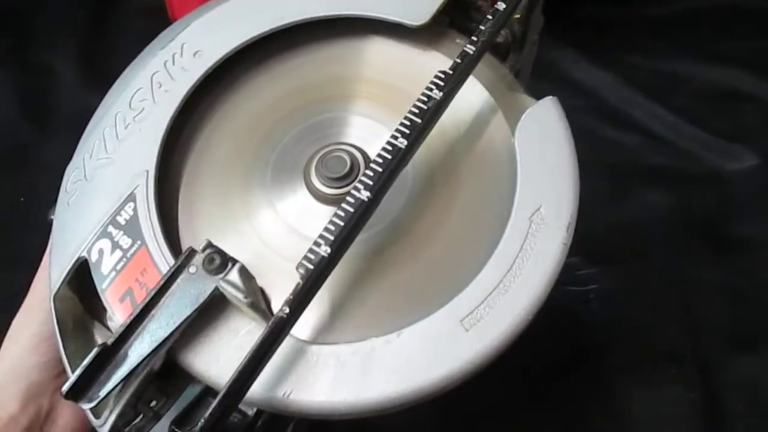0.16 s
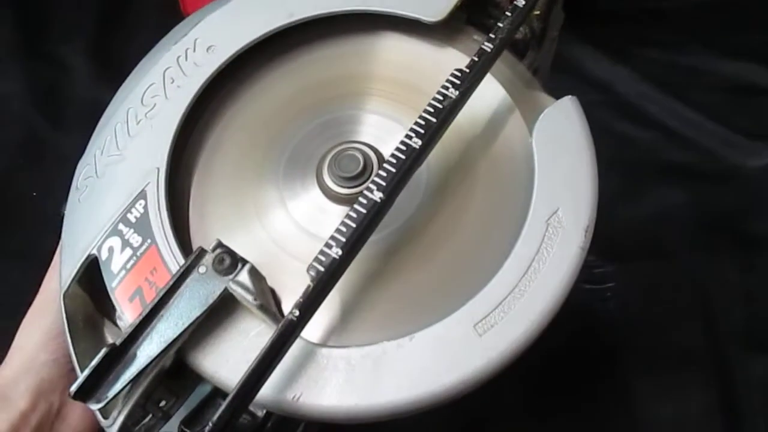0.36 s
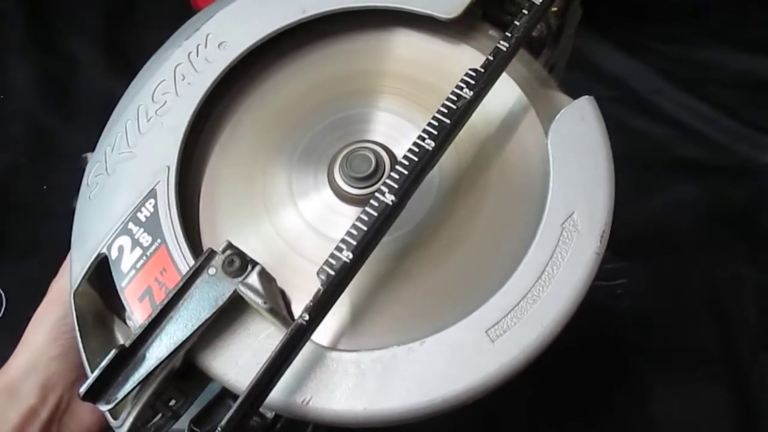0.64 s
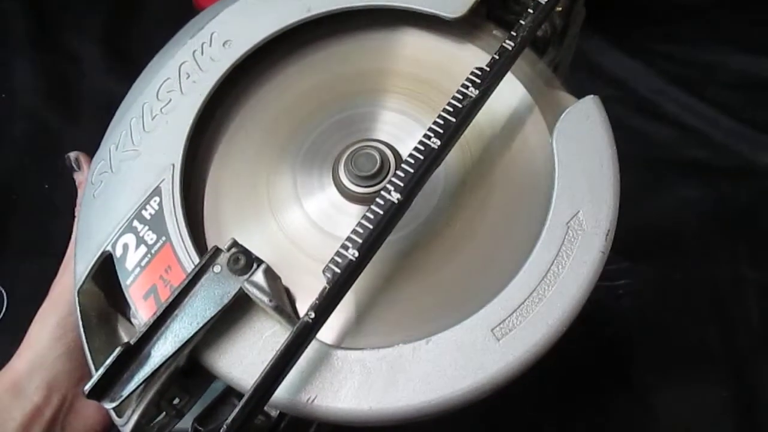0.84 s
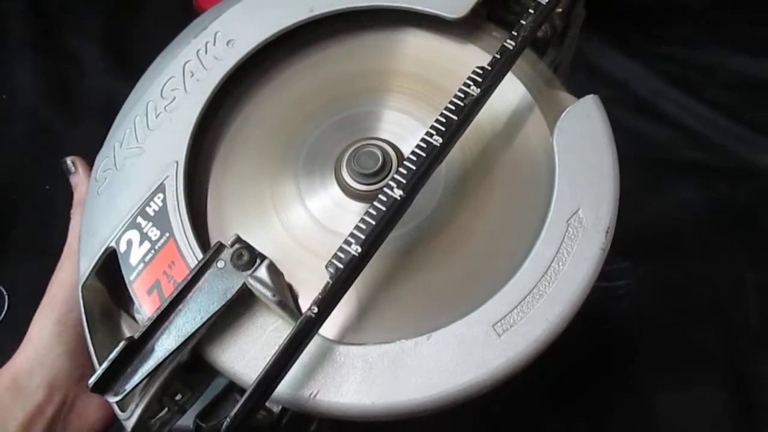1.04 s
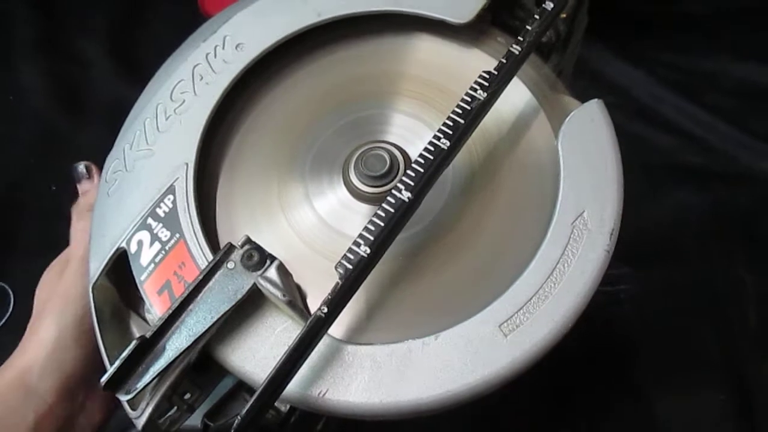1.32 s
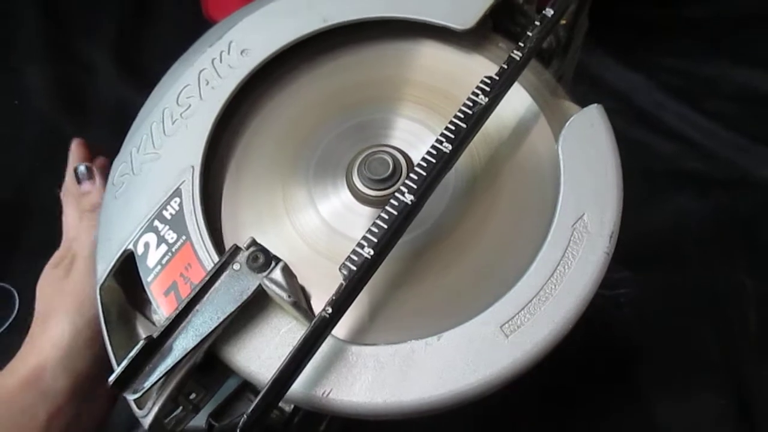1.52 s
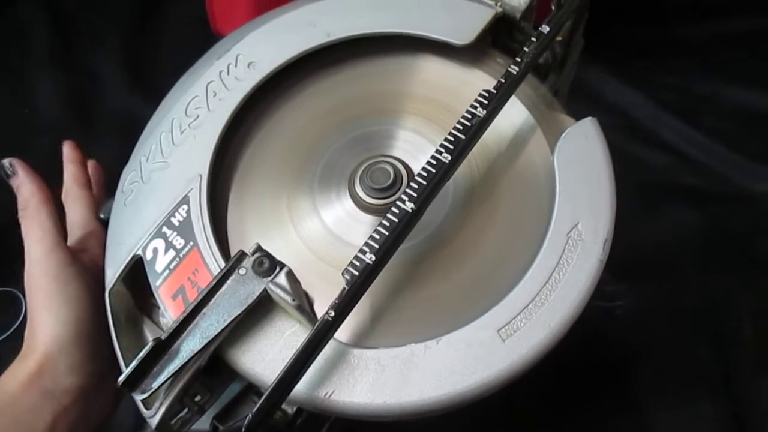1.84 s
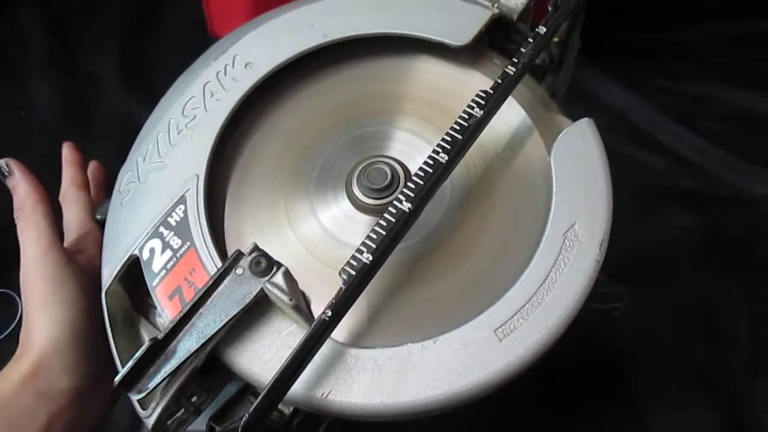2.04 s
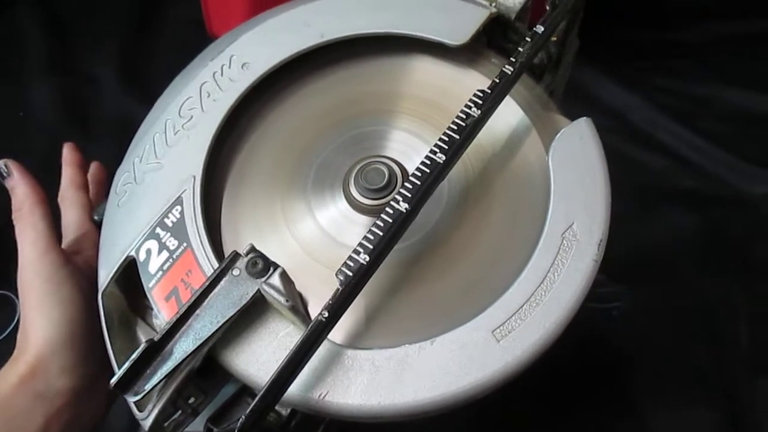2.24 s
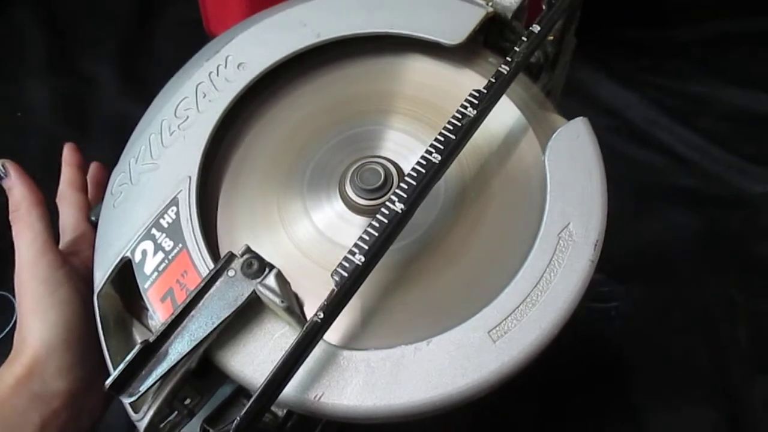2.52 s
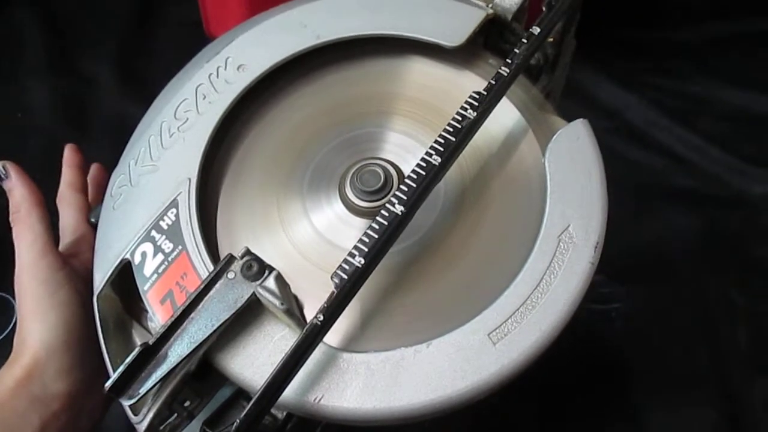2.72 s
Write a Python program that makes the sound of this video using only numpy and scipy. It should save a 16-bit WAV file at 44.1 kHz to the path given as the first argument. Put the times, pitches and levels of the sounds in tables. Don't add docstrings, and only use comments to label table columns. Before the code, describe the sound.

A circular saw whirs loudly at full speed, then coasts down, whine sinking amid rattling gear chatter

```python
import sys
import numpy as np
from scipy import signal
from scipy.fft import rfft, irfft, next_fast_len
from scipy.io import wavfile
from scipy.ndimage import uniform_filter1d

SR = 44100
rng = np.random.default_rng(int(sys.argv[2]) if len(sys.argv) > 2 else 0)


def wrap_up_sound(samples):
    columns = np.atleast_2d(samples).T
    tamed = np.clip(columns, -1, 1)
    steps = np.round(tamed * 32767).astype(np.int16)
    wavfile.write(sys.argv[1], SR, steps)


def volts_from_db(level):
    exponent = np.asarray(level, float) / 20
    return 10 ** exponent


N = 126567

# (time [s], fan whine level [dB], unbalance hum level [dB])
SHAFT_LEVELS = [(0.0, -19.5, -33), (0.15, -18.5, -33.5), (0.32, -17.5, -37.5), (0.4, -21.5, -38),
                (0.49, -31, -33), (0.57, -26, -43), (0.8, -28.5, -36.5), (0.95, -22.5, -39.5),
                (1.2, -21, -49), (1.34, -24.5, -56), (1.45, -21, -48), (1.62, -20.5, -53),
                (1.88, -32, -46.5), (2.06, -27, -42), (2.29, -37, -46), (2.45, -33.5, -43.5),
                (2.72, -22.5, -47), (2.87, -21.5, -49)]
# (multiple of shaft speed, level [dB], loudest near [Hz], reach [Hz])
SHAFT_MULTIPLES = [(.172, -60, 60, 60), (2, -48, 570, 35), (4, -43, 1500, 400), (10, -40, 2400, 300),
                   (11, -37, 3320, 160), (15, -48, 5000, 1500), (16, -44, 4850, 700), (24, -41, 9900, 300),
                   (36, -58, 14800, 500)]
# (time [s], air level [dB], chatter level [dB])
RUNNING_LEVELS = [
    (0, -15.5, -21),
    (.34, -17, -24.5),
    (.5, -17.5, -22.5),
    (.9, -20, -21),
    (1.5, -21, -21),
    (2.0, -22.5, -21.5),
    (2.45, -21.5, -19.5),
    (2.87, -23, -19.5),
]
# (frequency [Hz], level per Hz [dB])
AIR_FAST = [(20, -46), (300, -15), (600, -10.5), (1100, 0), (2070, -9), (3600, -4.5), (8800, -14),
            (11000, -25.5), (15600, -36)]
AIR_SLOW = [(20, -29), (190, -24.5), (330, -11), (1100, -13), (2200, -1), (4500, -13.5), (8300, -17.5),
            (11000, -29.5), (15600, -51)]
# (frequency [Hz], width [Hz], level [dB])
HOUSING = [(879, 192, -4), (1024, 123, -0.5), (1138, 82, 0.6), (1242, 41, 0.5), (1398, 140, -6),
           (1757, 196, -11), (2369, 107, -2.5), (2537, 110, -2), (2704, 48, 1.5), (3480, 380, -10),
           (4190, 99, -8), (5360, 124, -10.5), (6470, 190, -11)]
# (frequency [Hz], width [Hz], level [dB])
GEARS = [(4830, 1900, -7.5), (5770, 200, 0), (6170, 370, -2.5), (6675, 430, -2.5), (7120, 460, -2.5),
         (7970, 670, -6.5), (8570, 380, -2), (8960, 250, 0.5), (9280, 330, 1.5), (9970, 320, -5.5),
         (10330, 280, -6.5), (11130, 490, -14.5), (12700, 1100, -37), (15200, 1800, -32)]
# (time of peak [s], gear ring level [dB], blade ring
# level [dB])
KNOCKS = [(0.026, -36, -24), (0.055, -44, -28), (0.083, -29, -29), (0.113, -23, -22),
          (0.138, -24, -25), (0.156, -26, -29), (0.183, -43, -25.5), (0.212, -48, -25),
          (0.24, -36, -25), (0.268, -33, -26), (0.297, -40, -28), (0.316, -36, -26), (0.344, -37, -27),
          (0.361, -21, -29), (0.391, -28, -34), (0.416, -26, -34.0), (0.446, -29, -33),
          (0.475, -20.5, -41), (0.506, -30, -37), (0.535, -18.5, -30), (0.566, -29, -29.0),
          (0.593, -23, -28), (0.619, -25, -40), (0.689, -33, -42), (0.718, -23, -31),
          (0.817, -21, -34.0), (0.847, -27, -41), (0.885, -20.5, -39), (0.916, -28, -34),
          (0.951, -28, -39),
          (0.98, -17.5, -33), (1.017, -27, -37), (1.044, -27, -40), (1.074, -22, -43),
              (1.124, -22, -45), (1.16, -18.5, -35), (1.183, -18.5, -37), (1.218, -21, -30),
              (1.249, -21, -29), (1.277, -27, -33.0), (1.33, -21.5, -39), (1.342, -27, -38),
              (1.383, -21, -30), (1.412, -30, -30), (1.442, -25, -33.0), (1.469, -20, -28.5),
              (1.499, -22, -35.0), (1.532, -24, -28.5), (1.562, -23, -35), (1.579, -21, -30),
              (1.606, -21.5, -33), (1.654, -21, -32), (1.689, -21.5, -27), (1.724, -27, -34),
              (1.758, -21, -33), (1.797, -20, -31), (1.83, -23, -32), (1.849, -18, -32), (1.885, -20, -33),
              (1.93, -19, -29),
          (1.965, -20, -26), (1.998, -26, -30), (2.032, -23, -25.5), (2.07, -21.5, -42),
               (2.104, -25, -31), (2.139, -21.5, -30), (2.176, -19.5, -35), (2.205, -19.5, -32),
               (2.254, -33, -33), (2.272, -19.5, -32), (2.304, -30, -36), (2.322, -26, -23.5),
               (2.35, -22, -34.0), (2.371, -22, -28), (2.402, -21, -32), (2.443, -25, -23.5),
               (2.48, -23, -32), (2.497, -26, -27), (2.522, -29, -32), (2.543, -27, -31),
               (2.575, -22.5, -29), (2.599, -28, -31), (2.625, -21.5, -32), (2.658, -28, -27),
               (2.699, -22, -23.5), (2.738, -28, -34), (2.774, -21, -27.0), (2.814, -20.5, -32.0),
               (2.834, -40, -42), (2.863, -21, -37)]
# (time [s], gear ring level [dB],
# blade ring level [dB])
MORE_KNOCKS = [(0.046, -16, -22), (0.446, -22, -26), (0.495, -18, -27), (1.015, -18, -28), (1.058, -26, -29),
               (1.068, -20, -34), (1.292, -11, -28), (1.361, -18, -33), (1.406, -15, -31), (1.435, -17, -33),
               (1.456, -13, -32), (1.75, -20, -33), (1.778, -34, -36), (1.977, -18, -26), (2.018, -21, -30),
               (2.039, -16, -24), (2.091, -23, -32), (2.302, -20, -28), (2.436, -20, -39), (2.513, -27, -40),
               (2.536, -13, -30), (2.675, -14, -27), (2.727, -22, -31), (2.834, -19, -31)]
# (time [s], frequency [Hz], level [dB], length [s])
FLARES = [
    (0.026, 1120, -21, 0.079),
    (0.233, 1121, -21, 0.072),
    (0.666, 900, -26, 0.07),
    (.93, 890, -26.5, .1),
    (1.822, 2420, -25.5, 0.077),
    (2.17, 1115, -26, 0.073),
    (2.2, 2730, -31, 0.043),
    (2.526, 1202, -24.5, 0.11),
    (2.66, 2424, -26, 0.091),
    (2.752, 1490, -32, 0.15),
]
# (time [s], level [dB])
TICKS = [(1.3074, -35), (1.4396, -30), (1.5763, -34), (1.6551, -34), (1.7215, -38), (1.926, -38),
         (1.9984, -27), (2.0293, -38), (2.0672, -38), (2.1021, -40), (2.1375, -39), (2.2039, -36),
         (2.2717, -36), (2.3002, -40), (2.3206, -37), (2.3451, -37), (2.369, -35), (2.3984, -39),
         (2.4418, -39), (2.4748, -34), (2.5197, -40), (2.6194, -39), (2.6539, -35), (2.6988, -32),
         (2.7347, -34), (2.7726, -37), (2.8075, -38)]
# (frequency [Hz], width [Hz], level [dB])
RIM = [(11200, 900, 2), (12600, 500, -2), (13900, 700, -10), (15200, 700, -12)]


def evened(x):
    return x / np.sqrt(np.mean(x ** 2) + 1e-20)


def curve(table, column):
    rows = np.array(table, float)
    return np.interp(np.arange(N) / SR, rows[:, 0], rows[:, column])


def read_spectrum(points, hz):
    point_hz, level_db = np.transpose(points)
    return np.interp(np.log(hz + 1), np.log(point_hz + 1), level_db)


def wander(seconds):
    size = max(int(seconds * SR), 2)
    once = uniform_filter1d(rng.standard_normal(N), size)
    return evened(uniform_filter1d(once, size))


def ring(x, modes, order):
    size = next_fast_len(N + 4096)
    one_sample_delay = np.exp(-2j * np.pi * np.fft.rfftfreq(size))
    response = 0
    for k, (hz, width_hz, db) in enumerate(modes):
        pole = np.exp((2j * np.pi * hz - np.pi * width_hz) / SR)
        mode = 0
        for p in (pole, pole.conj()):
            mode = mode + ((1 - abs(pole)) / (1 - p * one_sample_delay)) ** order
        response = response + (-1) ** k * volts_from_db(db) * mode
    response = response / np.sqrt(np.mean(abs(response) ** 2))
    return irfft(rfft(x, size) * response, size)[:N]


def grains(per_s, spread_db):
    size_db = spread_db * np.minimum(rng.exponential(1, N), 5)
    contact = volts_from_db(size_db) * rng.choice([-1., 1.], N)
    return evened(contact * (rng.random(N) < per_s / SR))


def shaft_speed():
    t = np.arange(N) / SR
    powered = 407 + 18.8 * t
    coasting = 211.57 * np.tan(1.09685 - 0.119955 * (t - 0.335))
    return np.minimum(powered, coasting)


def shaft_tones():
    speed = shaft_speed()
    turn = 2 * np.pi * np.cumsum(speed) / SR
    whine_level = volts_from_db(curve(SHAFT_LEVELS, column=1) + 1.17 * wander(0.012))
    whine = whine_level * np.cos(12 * turn + 0.13 * wander(0.004))
    hum_level = volts_from_db(curve(SHAFT_LEVELS, column=2) + 0.86 * wander(0.047))
    hum = hum_level * np.cos(turn + 0.67 * wander(0.024))
    out = whine + hum
    for multiple, db, loudest_hz, reach_hz in SHAFT_MULTIPLES:
        resonance = np.exp(-((multiple * speed - loudest_hz) / reach_hz) ** 2 / 2)
        level = volts_from_db(db + 4.5 * wander(0.049))
        out += resonance * level * np.cos(multiple * turn + 0.2 * wander(0.046))
    return np.sqrt(2) * out


def air():
    fast_hz, slow_hz, patchy_db = 380, 232, 0.5
    size, hop = 2048, 512
    frames, hz = N // hop + 5, np.fft.rfftfreq(size, 1 / SR)
    real, imaginary, patches = rng.standard_normal((frames, len(hz), 3)).T
    patches = evened(uniform_filter1d(uniform_filter1d(patches, 16, 0), 5, 1))
    speed = shaft_speed()[np.minimum(np.arange(frames) * hop, N - 1)]
    fast = np.clip((speed - slow_hz) / (fast_hz - slow_hz), 0, 1)
    fast_db, slow_db = read_spectrum(AIR_FAST, hz), read_spectrum(AIR_SLOW, hz)
    colour = volts_from_db(fast_db[:, None] * fast + slow_db[:, None] * (1 - fast))
    colour = colour / np.sqrt((colour ** 2).mean(0))
    spectrum = (real + 1j * imaginary) * colour * volts_from_db(patchy_db * patches)
    rush = signal.istft(spectrum, nperseg=size, noverlap=size - hop)[1][:N]
    return volts_from_db(curve(RUNNING_LEVELS, column=1)) * evened(rush)


def chatter():
    throb = np.exp(0.17 * wander(0.0066))
    drive = grains(per_s=7000, spread_db=2) * throb
    return volts_from_db(curve(RUNNING_LEVELS, column=2)) * evened(ring(drive, HOUSING, order=1))


def magnet_rumble():
    off_s, fade_s, level_db, centre_hz = 0.42, 0.016, -39.5, 151
    band = signal.butter(1, [centre_hz / 2, 2 * centre_hz], "bandpass", fs=SR, output="sos")
    low = signal.sosfilt(band, rng.standard_normal(N))
    return volts_from_db(level_db) * evened(low) / (1 + np.exp((np.arange(N) / SR - off_s) / fade_s))


def knocks():
    rise_s, fall_s, tail_s, tail = 0.0016, 0.0041, 0.024, 0.12
    knock_db, more_knocks_db = 1, -11
    gear_rub_db, blade_rub_db, body_db = -37.5, -51.5, 4.5
    t = np.arange(-2000, 2001) / SR
    after = np.exp(-abs(t) / fall_s) + tail * np.exp(-abs(t) / tail_s)
    flurry = np.where(t < 0, np.exp(-abs(t) / rise_s), after / (1 + tail))
    heavy, light = np.array(KNOCKS), np.array(MORE_KNOCKS)
    hits = np.zeros((2, N))
    hits[:, np.minimum((heavy[:, 0] * SR).astype(int), N - 1)] = volts_from_db(heavy[:, 1:].T + knock_db)
    hits[:, (light[:, 0] * SR).astype(int)] += volts_from_db(light[:, 1:].T + more_knocks_db)
    gear, blade = signal.oaconvolve(hits, flurry[None], "same")
    first_contact = np.exp(-(t / 0.00035) ** 2)
    blade = blade + 0.63 * signal.oaconvolve(hits[1], first_contact, "same")
    contacts = grains(per_s=14000, spread_db=1.5)
    rub = volts_from_db(4.7 * wander(0.0049))
    gear_modes = [mode for mode in GEARS if mode[0] < 8000]
    blade_modes = [mode for mode in GEARS if mode[0] >= 8000]
    gear_ring = ring((gear + rub * volts_from_db(gear_rub_db)) * contacts, gear_modes, order=2)
    blade_ring = ring((blade + rub * volts_from_db(blade_rub_db)) * contacts, blade_modes, order=2)
    body = volts_from_db(body_db) * ring(gear * contacts, HOUSING, order=1)
    return gear_ring + blade_ring + body


def flares():
    t, out = np.arange(N) / SR, np.zeros(N)
    for peak_s, hz, db, length_s in FLARES:
        swell = volts_from_db(db) * np.exp(-((t - peak_s) / length_s) ** 2)
        out += swell * ring(rng.standard_normal(N), [(hz, 33, 0)], order=1)
    return out


def ticks():
    level_db, rise_s, fall_s = -2, 0.0005, 0.0022
    t, rows, marks = np.arange(-800, 801) / SR, np.array(TICKS), np.zeros(N)
    marks[(rows[:, 0] * SR).astype(int)] = volts_from_db(rows[:, 1] + level_db)
    late = t - 2 * rise_s
    burst = np.exp(-abs(late) / np.where(late < 0, rise_s, fall_s))
    drive = signal.oaconvolve(marks, burst, "same") * rng.standard_normal(N)
    return ring(drive, RIM, order=2)


def scene():
    running = shaft_tones() + air() + chatter() + magnet_rumble()
    struck = knocks() + flares() + ticks()
    return (running + struck)[None]


def low_pass(x):
    return signal.sosfilt(signal.butter(12, 15750, fs=SR, output="sos"), x)


def record(dry):
    mix = 1.24 * np.tanh(dry / 1.178)
    return low_pass(mix)


dry = scene()
out = record(dry)
wrap_up_sound(out)
```